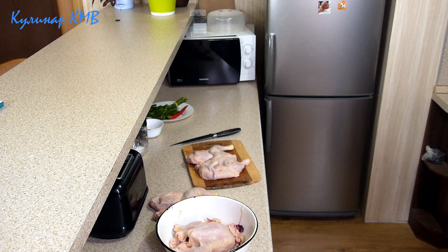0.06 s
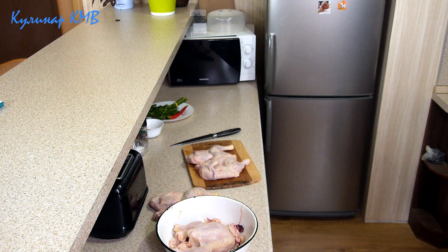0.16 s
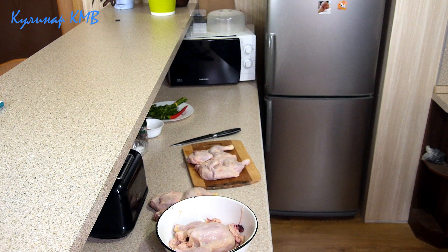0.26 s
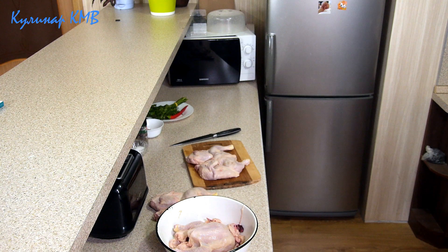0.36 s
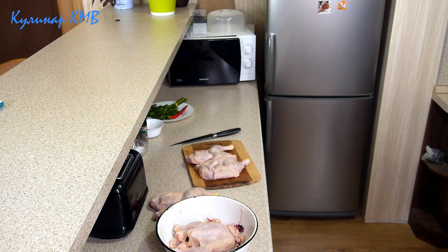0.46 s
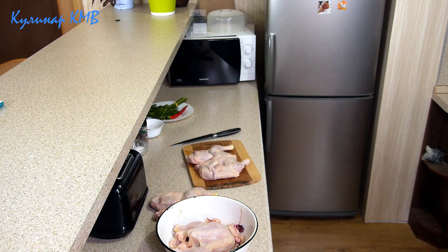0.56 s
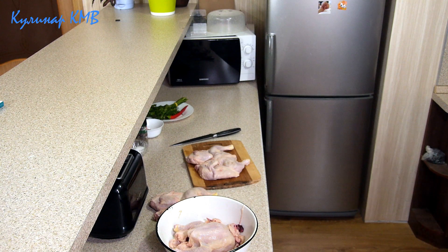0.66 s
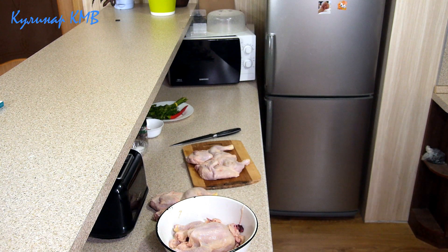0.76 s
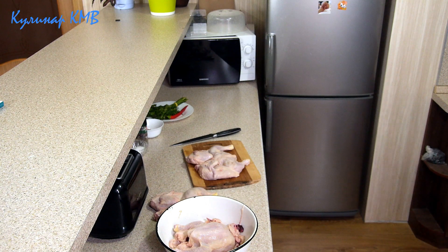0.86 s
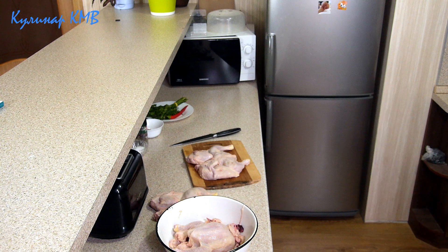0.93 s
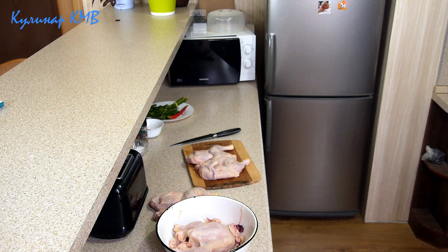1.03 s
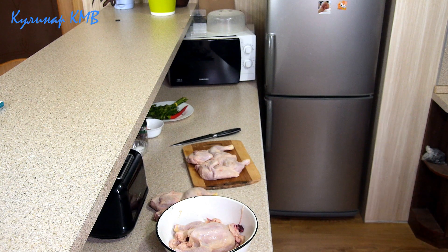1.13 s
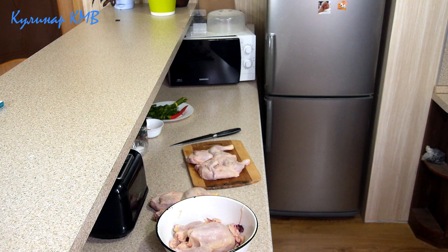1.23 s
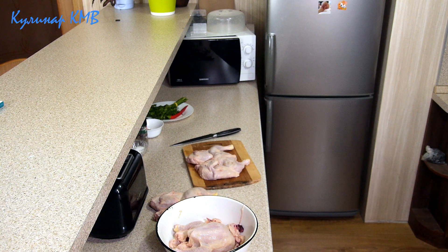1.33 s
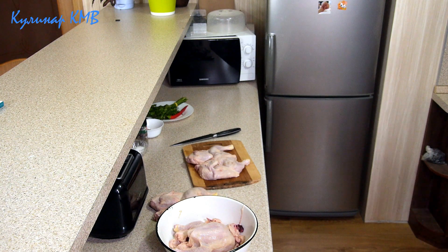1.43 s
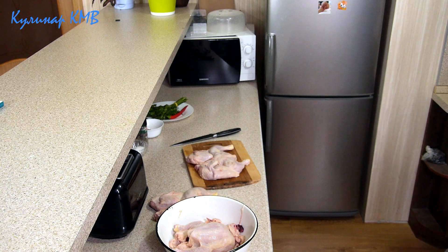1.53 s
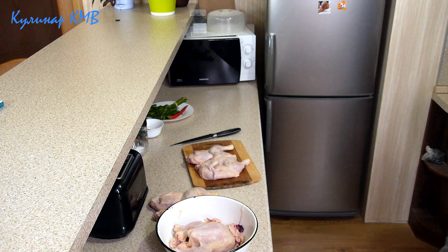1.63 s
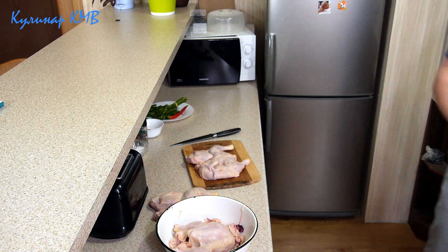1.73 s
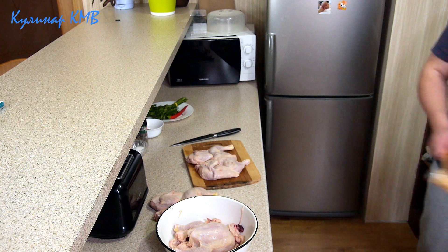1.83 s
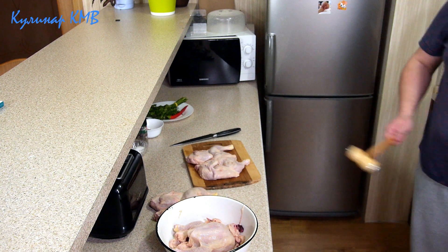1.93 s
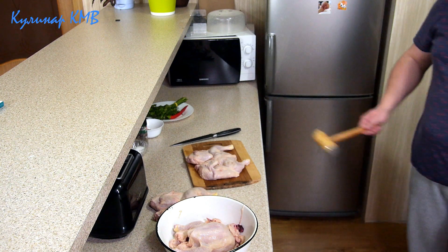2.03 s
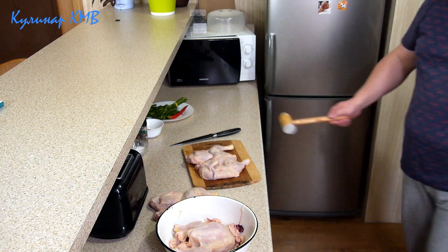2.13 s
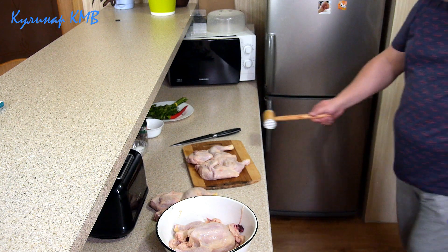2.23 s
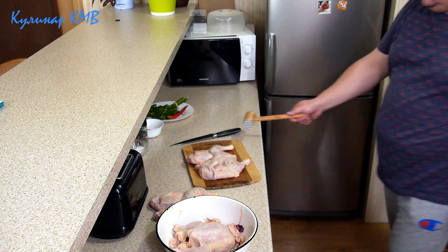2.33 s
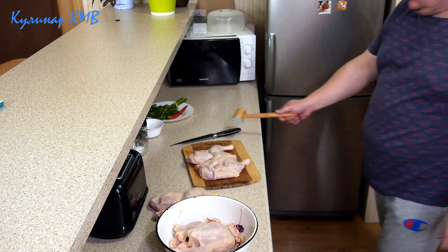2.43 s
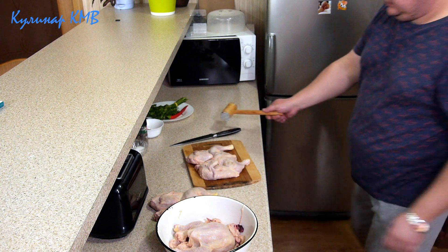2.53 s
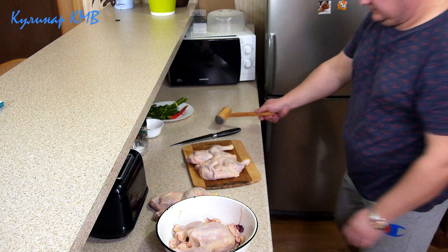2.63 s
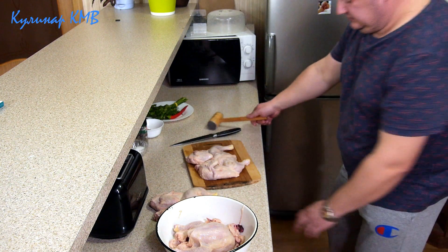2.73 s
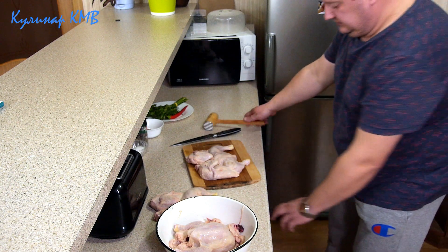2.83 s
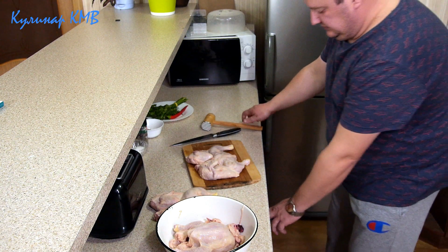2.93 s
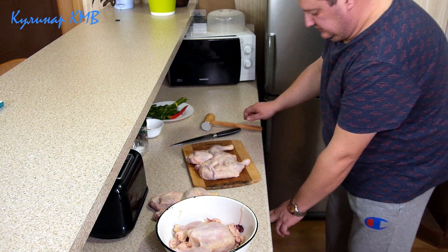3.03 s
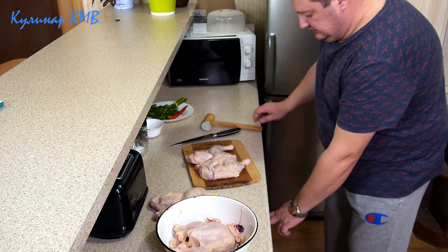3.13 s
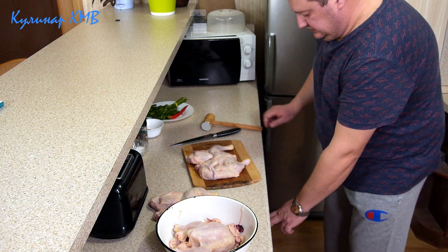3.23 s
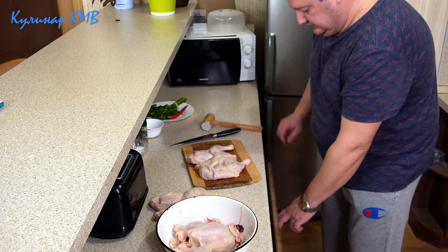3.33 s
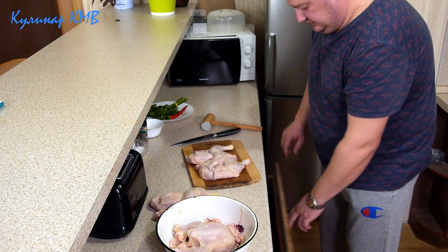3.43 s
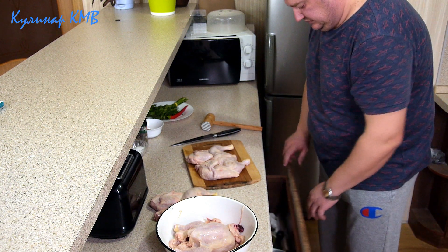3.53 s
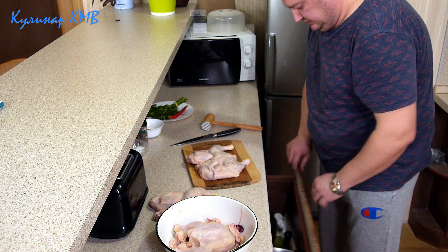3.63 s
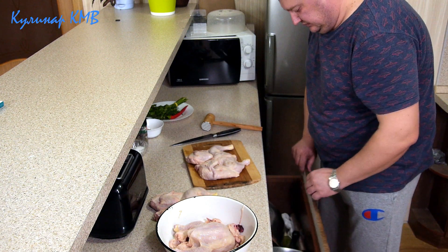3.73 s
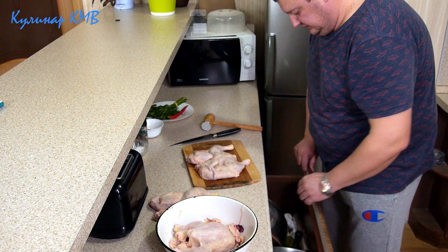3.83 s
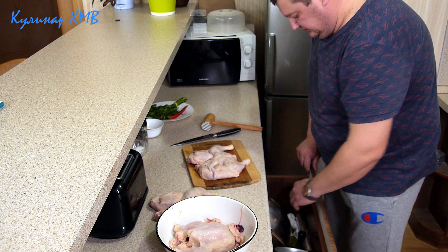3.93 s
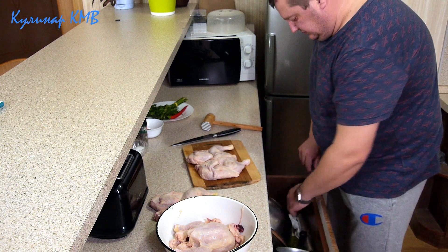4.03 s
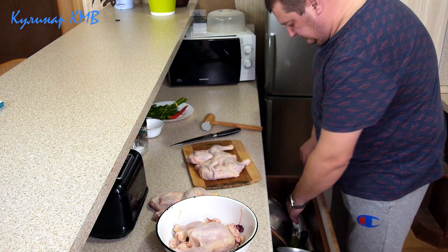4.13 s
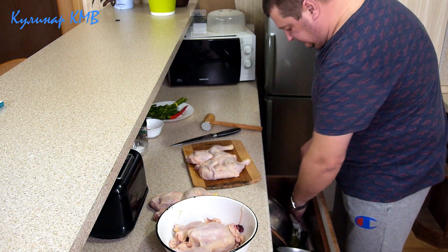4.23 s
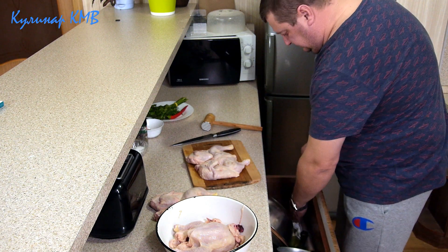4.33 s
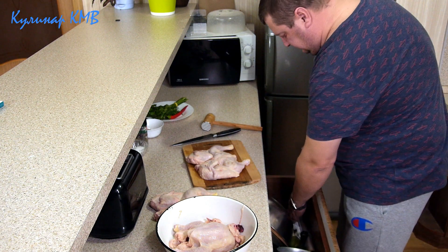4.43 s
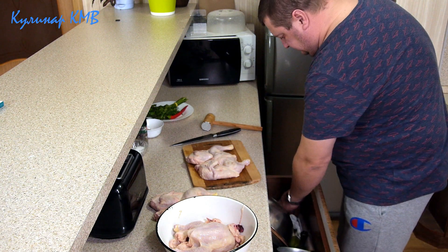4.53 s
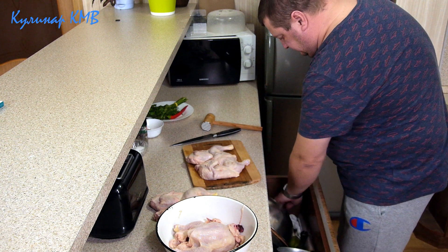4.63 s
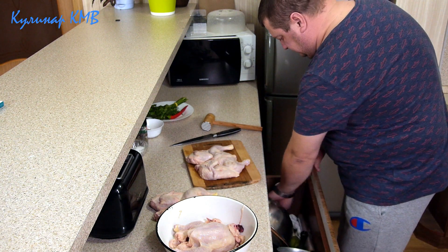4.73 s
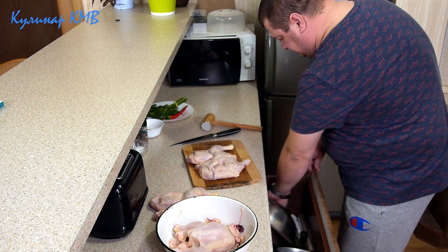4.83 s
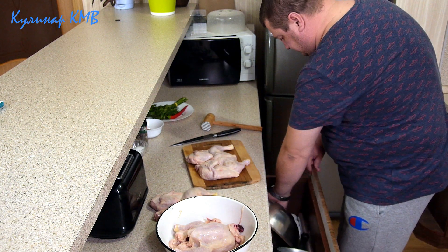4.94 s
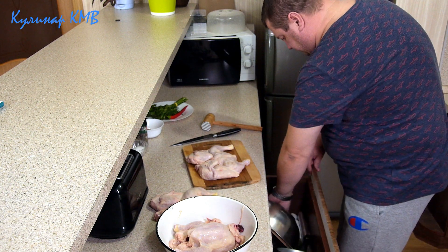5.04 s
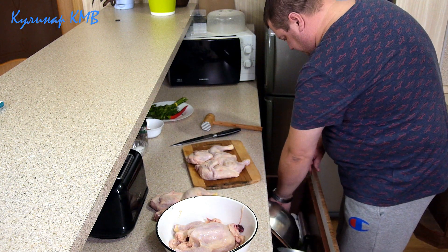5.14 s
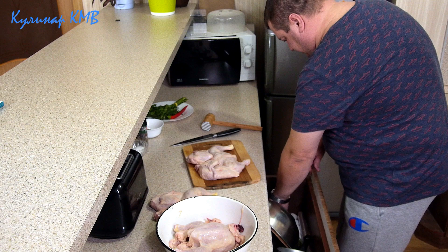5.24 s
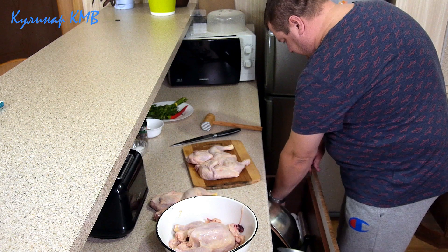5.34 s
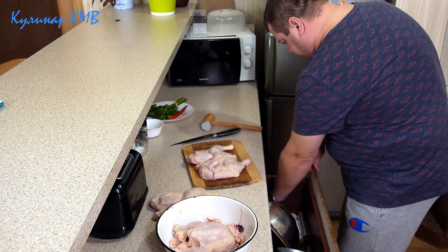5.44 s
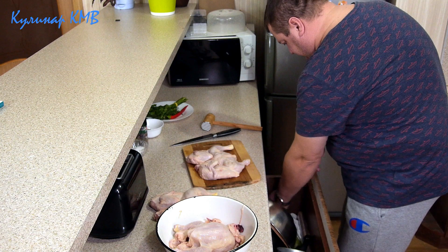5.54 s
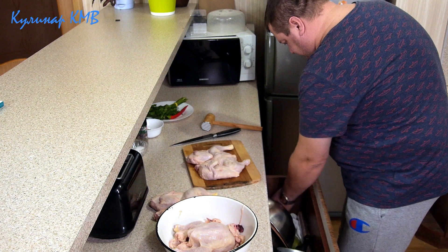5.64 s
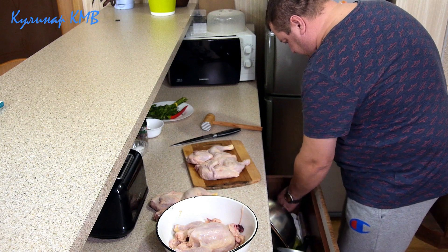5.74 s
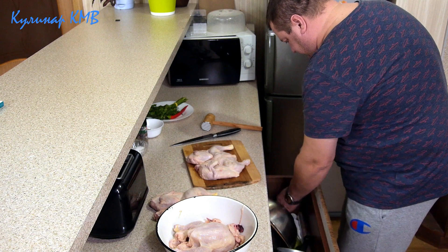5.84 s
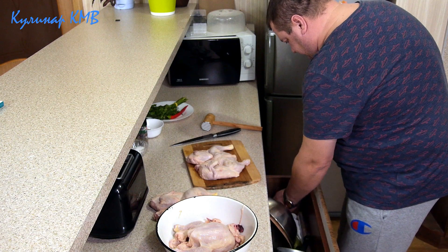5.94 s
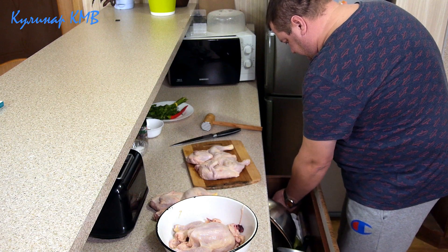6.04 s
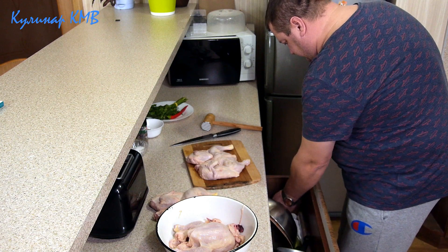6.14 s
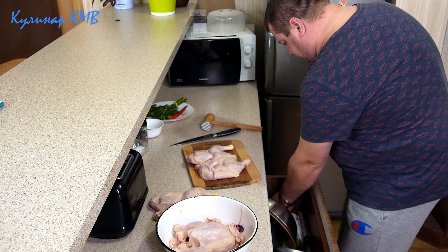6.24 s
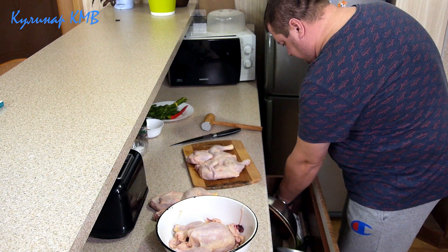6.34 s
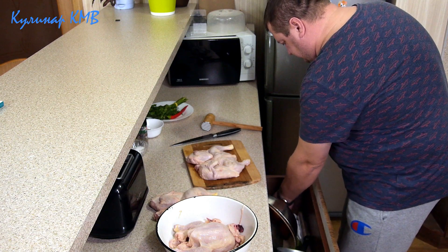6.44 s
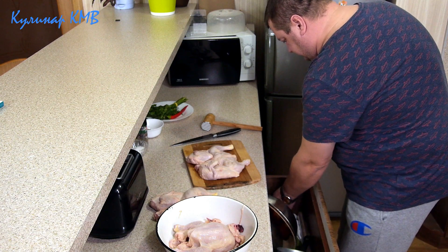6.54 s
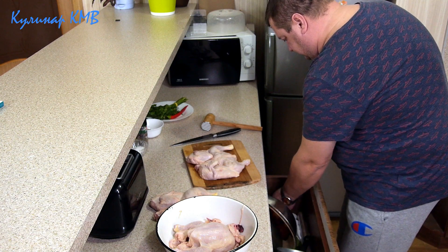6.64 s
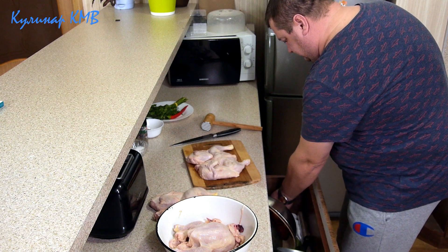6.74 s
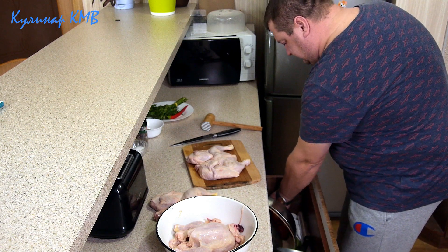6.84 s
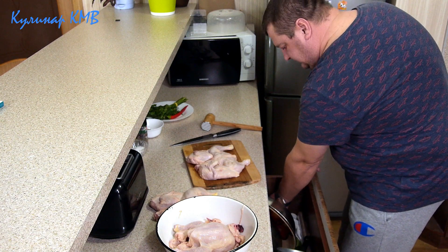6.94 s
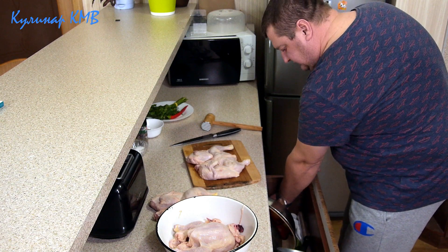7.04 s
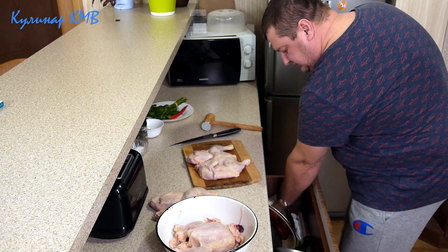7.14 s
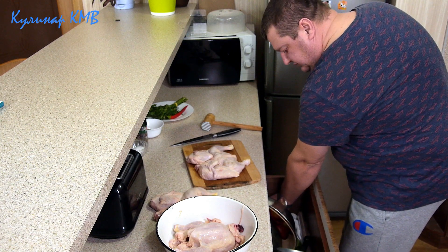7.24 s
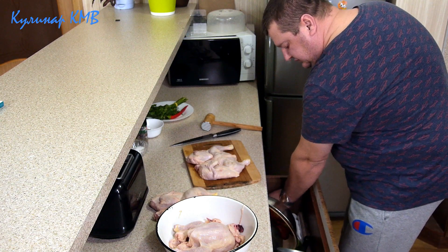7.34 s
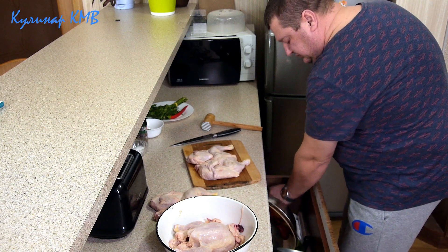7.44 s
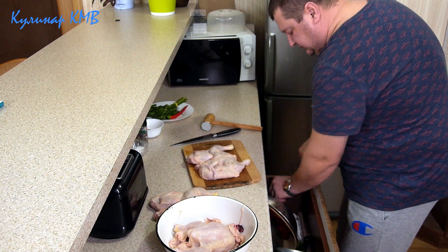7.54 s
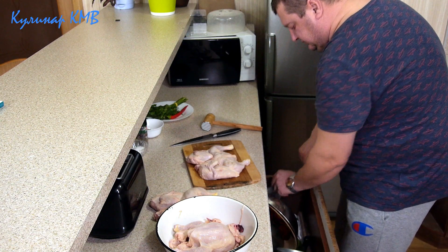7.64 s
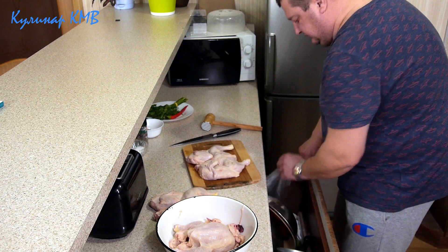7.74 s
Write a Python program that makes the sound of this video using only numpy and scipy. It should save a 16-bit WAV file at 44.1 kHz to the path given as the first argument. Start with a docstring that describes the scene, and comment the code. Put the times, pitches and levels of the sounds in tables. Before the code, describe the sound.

Off-screen cupboard clatter opens the scene: gritty metal scraping, bright clangs and a shelf knock. A near-silent gap follows, then a tight burst of hard mallet knocks on the counter. A wooden drawer rolls out, a pan bangs loudly, and a hand searches through cookware with muffled clunks, ticks and hiss. The room is live with a short tail, low hum and faint microphone hiss.

```python
"""Kitchenware, a meat mallet and a drawer

Kitchenware is dragged and clinked out of a cupboard: friction slips and blows that excite damped modes.
A meat mallet bounces on its wood and topples onto its metal head: sharp pulses leave modes ringing.
A drawer rolls open and a hand rummages among pans and pots: panel rumble, blows and a dry hiss of slips.
A fridge hums as wavering sines in a small, hard-walled kitchen of sparse, decaying echoes."""
import sys
import numpy as np
from scipy import signal
from scipy.fft import rfft, irfft
from scipy.io import wavfile
from scipy.ndimage import uniform_filter1d

SR = 44100
rng = np.random.default_rng(int(sys.argv[2]) if len(sys.argv) > 2 else 0)


def transcribe(u):
    """Save the signal u as a 16-bit wav file named by the first command-line argument.

    u: samples, shape (n,) or (channels, n), limited to [-1, 1]; the rate is SR.
    q: integer samples, one column per channel.
    """
    v = np.clip(np.atleast_2d(u).T, -1, 1)
    q = np.round(v * 32767).astype(np.int16)
    wavfile.write(sys.argv[1], SR, q)


N = 343098
HZ = np.fft.rfftfreq(4096, 1 / SR)  # frequency grid of the filters
T = np.arange(SR // 2) / SR  # time axis of one blow, s

# All levels in these tables are relative; the functions add the trim of each layer.
# Still room air and microphone hiss, spectra: [frequency_hz, level_db]
AIR_SPECTRUM = [(12, -43.5), (20, -10.5), (53, -5), (96, -2.5), (274, -5), (448, -1.5), (612, -6.5),
                (675, -9), (757, -7.5), (1000, -17.5), (1300, -50), (2200, -120)]
HISS_SPECTRUM = [(500, -10.5), (1000, 4), (2500, -4), (6000, -4), (15000, -12)]
AIR_LEVEL_DB, HISS_LEVEL_DB = -64, -68.5
# Steady lines of the fridge's hum: [pitch_hz, level_db]
FRIDGE_LINES = [(48.4, -70), (393, -84), (441.4, -73)]
# Two swells of one low line of the hum: [middle_s, length_s, level_db]
DRONE_SWELLS = [(4.2, 1.9, -70), (7.05, 1.3, -66)]
DRONE_HZ = 167

# Strokes of metal dragged over metal: [start_s, length_s, grind_db, hiss_db]
DRAG_STROKES = [(0.0, 0.17, -35.5, -38.5), (0.21, 0.42, -39.5, -43.5), (0.351, 0.041, -31.5, -31.5),
                (0.46, 0.11, -37.5, -31)]
# Low, grinding part of the drag, spectrum: [frequency_hz, level_db]
GRIND_SPECTRUM = [(59, -59), (100, -14), (140, -23), (229, -2.5), (286, -10.5), (336, -3), (476, -6.5),
                  (1160, -10), (1360, -6), (4500, -20.5), (5850, -73), (9900, -120)]
# The dragged lid sings on one mode, the turned big pot on its low mode: [start_s, length_s, level_db]
LID_SONG = [(0.451, 0.064, -37), (.555, 0.048, -37)]
POT_SONG = [(5.63, 0.06, -53)]
LID_SONG_HZ, POT_SONG_HZ = 1225, 520
BITE_S, LET_GO_S = 0.0041, 0.033  # a stroke's linear onset and its exponential release

# Crowded thin-metal modes, and the tick of rim on rim, spectra: [frequency_hz, level_db]
CLANG_SPECTRUM = [(60, -74), (200, -1), (450, -1.5), (700, -2), (1100, 1.5), (2100, 1), (2700, -1.5),
                  (4000, -4.5), (6000, -15), (15000, -82.5)]
TICK_SPECTRUM = [(800, -26), (2500, 3), (3900, -6.5), (5100, 2), (6500, 0.5), (8200, -2), (10000, -7.5),
                 (13000, -14), (16000, -35.5)]
# Blows on each object, with the thump of the wood beneath: [start_s, clang_db, thump_db, tick_db]
LID_HITS = [(0.030, -27.5, -30, -41), (0.07, -55, -53, -30.5), (0.127, -27, -30, -32),
            (0.447, -20.5, -22, -27.5), (0.501, -21, -49, -27.5), (0.553, -23.5, -43, -51)]
UTENSIL_HITS = [(0.2692, -33.5, -51, -40), (0.2904, -56, -43, -53)]
SHELF_HITS = [(0.78, -29.5, -33.5, -40.5), (0.802, -33, -40, -59), (1.037, -37, -32.5, -51.5)]  # things set down on the cupboard shelf
DOOR_HITS = [(1.222, -50.5, -40.5, -53)]  # the cupboard door pushed shut
PAN_HITS = [(4.814, -45, -49, -61), (4.916, -15, -45, -52), (4.921, -20.5, -33, -24.5),
            (4.941, -20.5, -48, -55), (5.014, -23, -57, -29.5), (5.056, -27.5, -32, -38.5),
            (5.095, -32, -28.5, -50)]
HELD_PAN_HITS = [(7.2036, -42, -61, -40), (7.2516, -70, -86, -54)]  # a pan in the hand
BIG_POT_HITS = [(5.386, -51, -32, -42), (5.401, -34, -35, -39)]
POT_HITS = [(6.069, -57, -45, -47), (6.222, -48.5, -76, -66), (6.272, -26.5, -49, -32),
            (6.437, -45, -40, -49), (6.611, -44.5, -52, -57), (7.312, -57, -51, -70),
            (7.522, -34.5, -44, -42), (7.595, -35, -42, -46), (7.768, -40.5, -48, -45)]
DRAWER_HITS = [(3.43, -39.5, -54, -45), (3.614, -46.5, -49, -51), (4.925, -26.5, -36, -50),
               (5.098, -51, -38.5, -50), (5.14, -31, -48, -51), (6.118, -50, -47.5, -45.5),
               (6.717, -43, -44, -35), (7.566, -29.5, -46.5, -27.5)]  # from its catch, its runners and pot rims
# Ringing modes of each object: [pitch_hz, level_db, t60_s]
LID_MODES = [(358, 1, 0.061), (705, -1, 0.29), (1084, 11, 0.063), (1623, -4, 0.16), (2325, -18, 0.38),
             (3550, -18, 0.13), (4760, -1, 0.088), (6130, -19, 0.1), (6170, -31, 0.16)]
UTENSIL_MODES = [(3150, -7.5, 0.052), (4060, -9, 0.063), (4040, 0, 0.022), (4520, 2, 0.014),
                 (6570, -5, 0.029)]
SHELF_MODES = [(241, 0, 0.23), (261, 7, 0.2), (344, 9, 0.17)]
DOOR_MODES = [(244, 2, 0.13), (750, 5, 0.034), (930, 2.5, 0.042), (1080, -6, .035), (1330, 0, 0.033),
              (1780, -8, .04)]
STEEL_MODES = [(5750, -7, .2), (7250, -4, .22), (7640, 6, 0.21), (7640, -10, .2)]  # a small loose piece in the cupboard
WORKTOP_MODES = [(710, 11, 0.95), (805, -6.5, .3), (905, 2, 0.34), (970, -3.5, .25), (1072, 11.5, 0.33),
                 (1130, -0.5, 0.42), (1314, -2, 0.7), (1600, -13.5, .2), (2140, -26, 0.22)]
MALLET_MODES = [(696, 6.5, 0.3), (1287, -4, 0.96), (1500, 0.5, 0.33), (1740, -10.5, 0.093),
                (1910, 2.5, 0.15), (2924, 5.5, 0.21), (3350, -10.5, .12), (5160, -4, .25)]
PAN_MODES = [(287, -20, 0.21), (326, 6, 0.095), (540, -23, 0.18), (920, -2, 0.38), (1130, 7.5, 0.16),
             (1490, 6, 0.36), (1460, 3, 0.18), (1970, 6.5, 0.15), (2140, 15, 0.04), (2220, 9.5, 0.071),
             (3030, -4, 0.16), (5540, -18, 0.22), (6600, 8.5, 0.076)]
HELD_PAN_MODES = [(932, 1, 0.12), (1510, 14, 0.086), (1540, -7, 0.082)]
BIG_POT_MODES = [(272, 6, 0.25), (329, -2, 0.27), (510, 3.5, 0.28), (741, 3, 0.16), (1047, -3, 0.5),
                 (1164, -0.5, 0.41), (1530, -13.5, 0.88), (2160, -7.5, 0.37)]
POT_MODES = [(182, 4, 0.057), (377.4, 11, 0.3), (804, 2.5, 0.37), (847, 10, 0.29), (974, -3, 0.45),
             (1108, 13, 0.16), (1203, -21, 0.71), (1560, 4, 0.2), (2156, -22, 0.19), (5000, 7, .15)]
DRAWER_MODES = [(180, 23, 0.15), (300, -11, 0.047), (378, 13, 0.14), (634, -13, .15), (960, 28, .1)]
# Light touches of steel on steel: [start_s, level_db]
CUPBOARD_TOUCHES = [(0.78, -39.5), (1.037, -53)]
DRAWER_TOUCHES = [(5.731, -51), (5.803, -50), (5.965, -49), (6.12, -57), (6.37, -55)]

# Things shifted over wood, on the shelf, runners and drawer bottom: [middle_s, length_s, level_db]
WOOD_SLIDES = [(0.95, 0.54, -51), (3.62, 0.24, -50), (3.85, 0.41, -68), (5.6, 0.41, -53.5),
               (6.07, .15, -48.5), (6.3, .12, -43.5), (6.56, 0.05, -47.5), (7.04, 0.083, -56),
               (7.3, 0.96, -64), (7.73, 0.15, -53.5)]
# Sliding on wood, spectrum: [frequency_hz, level_db]
SLIDE_SPECTRUM = [(50, -28), (110, 0.5), (170, -2), (300, 3.5), (500, 0.5), (900, 0.5), (2000, -8.5),
                  (4000, -10), (9000, -40)]
# Cloth and wrappings brushing past things: [middle_s, length_s, level_db]
CLOTH_BRUSHES = [(2.48, 0.39, -64), (3.58, 0.46, -63), (4.68, 0.15, -58), (4.9, 0.11, -43),
                 (6.26, 0.021, -54)]
# Unbroken rustle of the searching hand, points on its level curve: [time_s, level_db]
HAND_RUSTLE = [(5.25, -57.5), (5.42, -52), (5.6, -51.5), (5.76, -57), (6.06, -58.5), (6.46, -54),
               (6.67, -59.5), (6.78, -56.5), (7.5, -50.5), (7.67, -47.5), (7.77, -45.5)]
# Rustle, spectrum: [frequency_hz, level_db]
RUSTLE_SPECTRUM = [(700, -12), (1500, -3.5), (3500, -4.5), (5500, -1.5), (7700, 1.5), (10000, -2),
                   (13500, -6.5), (16000, -20)]
# Mallet landings on its wood, then on its head: [start_s, level_db, brightness_db_per_octave, chatter_s]
WOOD_LANDINGS = [(2.7648, -22, -4.5, 0.0065), (2.7794, -18, 4, 0.000077), (2.8609, -20.5, 2.5, .0001),
                 (2.9100, -25.5, 4.5, 0.000088)]
HEAD_LANDINGS = [(2.9375, -17.5, -5.5, 0.0049), (3.0205, -23.5, -7, 0.0059)]
# Contact spectra of those landings: [frequency_hz, level_db]
WOOD_CONTACT = [(70, -47), (130, -5), (205, -4.5), (310, -11), (560, -5.5), (690, 4.5), (1200, 7),
                (1600, 2), (2100, -2), (2700, -27), (3400, -15.5), (4500, -41.5), (9000, -41.5),
                (15000, -66.5)]
HEAD_CONTACT = [(70, -26), (150, -14), (420, -14), (720, -4), (2000, 1), (2500, -7.5), (3600, 1),
                (4500, -15), (5250, 2.5), (5800, -18.5), (8500, -17.5), (15000, -69)]
# Echoes off the backsplash and the appliances round the worktop: [delay_s, level_db]
CLOSE_ECHOES = [(.0025, -16.5), (.0054, -23.5), (.008, -26.5)]
# The drawer pulled open: [middle_s, length_s, level_db]
DRAWER_ROLL = [(3.62, 0.23, -49.5)]

# Decay time of the kitchen: [frequency_hz, t60_s]
KITCHEN_T60 = [(120, 0.53), (400, 0.68), (1200, 0.62), (3000, 0.56), (6000, 0.53), (10000, 0.35),
               (16000, 0.35)]
# Stereo width as side minus mid, and the tilt as left minus right: [frequency_hz, level_db]
STEREO_WIDTH = [(60, -3.5), (150, -12.5), (500, -11), (1000, -6.5), (2000, -3), (4500, -3), (9000, -3.5),
                (15000, 1)]
STEREO_TILT = [(100, -3), (400, -0.1), (1200, 0), (2500, -2), (5000, -1), (8000, 0), (14000, 2)]
TREBLE_LIMIT_HZ = 15750


def amp(db):
    """Logarithmic level: decibels to gain."""
    return 10 ** (np.asarray(db) / 20)


def read(points, hz=HZ):
    """Interpolation of a spectrum on a logarithmic frequency axis."""
    f, value = np.transpose(points)
    return np.interp(np.log(hz + 1), np.log(f + 1), value)


def steady(x):
    """Mean power: scales a lasting sound to rms 1."""
    return x / np.sqrt(np.mean(x ** 2) + 1e-20)


def brief(x):
    """Total energy: scales a blow to the energy of 20 ms at rms 1."""
    return x * np.sqrt(SR / 50 / (np.sum(x ** 2) + 1e-20))


def add(mix, s, sound):
    """Superposition: mixes a sound in, in place, at time s."""
    part = mix[max(round(s * SR), 0):][:len(sound)]
    part += sound[:len(part)]


def level(s, db):
    """Level curve as gain, straight in decibels, fading out within 30 ms beyond its ends."""
    times = np.r_[s[0] - .03, s, s[-1] + .03]
    return amp(np.interp(np.arange(N) / SR, times, np.r_[-110, db, -110]))


def strokes(rows):
    """Scraping envelope: each stroke bites, holds and lets go; the strongest prevails."""
    t = np.arange(N) / SR
    gains = []
    for s, length, db in rows:
        bite = np.clip((t - s) / BITE_S, 0, 1)
        let_go = np.exp(-np.maximum(t - s - length, 0) / LET_GO_S)
        gains.append(amp(db) * bite * let_go)
    return np.max(gains, axis=0)


def swells(rows):
    """Gaussian envelope of smooth movements that gather speed and slow down again."""
    t = np.arange(N) / SR
    return sum(amp(db) * np.exp(-(2 * (t - s) / length) ** 2) for s, length, db in rows)


def colour(x, db):
    """Minimum phase: a causal filter with gain db on the HZ grid, by folding the cepstrum."""
    cepstrum = irfft(np.log(amp(db) + 1e-6))
    half = len(cepstrum) // 2
    cepstrum[1:half] *= 2
    cepstrum[half + 1:] = 0
    impulse_response = irfft(np.exp(rfft(cepstrum)))
    return signal.oaconvolve(x, impulse_response)[:len(x)]


def wavering(hz, width_hz, size):
    """Phase diffusion: a sine whose phase wanders, as in metal that keeps touching its neighbours."""
    wander = np.cumsum(rng.standard_normal(size)) * np.sqrt(2 * np.pi * abs(width_hz) / SR)
    wander = uniform_filter1d(wander, size=200)
    return np.sin(2 * np.pi * hz * np.arange(size) / SR + wander)


def ringing(modes):
    """Modal superposition: an object's free ring is a sum of dying tones, each about 20 Hz wide."""
    ring = np.zeros(len(T))
    for hz, db, t60 in modes:
        decay = amp(db - 60 * T / max(t60, .01))
        ring += decay * wavering(hz, 22, len(T)) * rng.choice([-1, 1])
    return ring


def contact(chatter_s, first=2.9):
    """Impact excitation: a first touch of height first, then an exponentially dying chatter."""
    x = rng.standard_normal(len(T)) * np.exp(-T / max(chatter_s, 1e-4))
    x[0] = first
    return x


def slips(per_s, spread_db):
    """Stick-slip friction: a random train of slips of uneven size, scaled to rms 1."""
    size = amp(spread_db * np.minimum(rng.exponential(1, N), 4))
    happens = rng.random(N) < per_s / SR
    return steady(size * rng.standard_normal(N) * happens)


def judder():
    """Unsteady friction: the gain of a sliding rim that catches and frees itself about every 15 ms."""
    sway = uniform_filter1d(uniform_filter1d(rng.standard_normal(N), size=600), size=100)
    return amp(2.5 * steady(sway))


def stereo(mid, side, left_db):
    """Interchannel coherence: mid and side give two channels, alike in the bass, less so in the treble."""
    side, lean_db = colour(side, read(STEREO_WIDTH)), (left_db + read(STEREO_TILT)) / 2
    return np.array([colour(mid + side, lean_db), colour(mid - side, -lean_db)])


def background(air_db=-2, hum_db=-1, waver_rad=.15):
    """Stationary noise and steady tones: still air, a faint hiss and the fridge's slightly wavering hum."""
    def noise(spectrum):
        """Filtered white noise at rms 1."""
        return steady(colour(rng.standard_normal(N), read(spectrum)))

    def bed():
        """Sum of two independent noises."""
        return amp(AIR_LEVEL_DB + air_db) * noise(AIR_SPECTRUM) + amp(HISS_LEVEL_DB) * noise(HISS_SPECTRUM)

    mid, side = bed(), bed()
    t = np.arange(N) / SR
    lines = [(hz, amp(db)) for hz, db in FRIDGE_LINES] + [(DRONE_HZ, swells(DRONE_SWELLS))]
    for hz, gain in lines:
        drift = steady(uniform_filter1d(uniform_filter1d(rng.standard_normal(N), size=6000), size=6000))
        tone = np.sin(2 * np.pi * hz * t + waver_rad * drift)
        mid = mid + gain * amp(hum_db) * np.sqrt(2) * tone
    return stereo(mid, side, left_db=2.1)


def drag(grind_db=-2, hiss_db=-2, ring_db=-9):
    """Friction-driven resonance: a lid scrapes over other metal and the slips keep it ringing."""
    grind = strokes([(s, length, db) for s, length, db, _ in DRAG_STROKES])
    hiss = strokes([(s, length, db) for s, length, _, db in DRAG_STROKES])
    grip = slips(per_s=2700, spread_db=1.5) * judder()
    lid = ringing(LID_MODES)
    ring = signal.oaconvolve(grip * grind, lid / np.linalg.norm(lid))[:N]
    body = steady(colour(grip, read(GRIND_SPECTRUM))) * grind
    treble = steady(colour(grip, read(TICK_SPECTRUM))) * hiss
    return amp(grind_db) * body + amp(ring_db) * ring + amp(hiss_db) * treble


def clatter(rows, modes, clang_db, thump_db, tick_db, ring_db, chatter_s, thump_hz,
            thump_octaves=0.46, thump_s=0.013, lowest_hz=110, rise_s=0.0021):
    """Impact radiation: each blow clangs the metal, ticks at the rim and thumps the wood beneath."""
    out = np.zeros(N)
    bass_cut = -10 * np.log10(1 + (lowest_hz / (HZ + 1)) ** 10)
    # one broad panel resonance
    panel = -20 * np.log10(1 + (np.log2((HZ + 1) / thump_hz) / thump_octaves) ** 2)
    # loose things give way before they bite: zero at first, so only the chatter sounds in clang and tick
    give = 1 - np.exp(-T / rise_s)
    for s, body, low, high in rows:
        touch = contact(chatter_s) * give
        ring = brief(ringing(modes) * give)
        clang = amp(clang_db) * brief(colour(touch, read(CLANG_SPECTRUM))) + amp(ring_db) * ring
        tick = brief(colour(touch, read(TICK_SPECTRUM)))
        thump = brief(colour(contact(thump_s), panel))
        add(out, s, amp(body) * clang + amp(high + tick_db) * tick + amp(low + thump_db) * thump)
    return colour(out, bass_cut)  # small objects radiate no deep bass


def singing(rows, hz, width_hz=12):
    """Self-sustained oscillation: stick and slip keep one mode of a lid or pot going."""
    return np.sqrt(2) * wavering(hz, width_hz, N) * strokes(rows)


def shifting(db=-1):
    """Panel excitation: coarse slips rumble in wooden panels."""
    sound = steady(colour(slips(per_s=700, spread_db=2.5), read(SLIDE_SPECTRUM)))
    return amp(db) * sound * swells(WOOD_SLIDES)


def cupboard_tinks(ring_db=-2):
    """Free vibration: light touches leave the loose steel piece ringing."""
    out = np.zeros(N)
    for s, db in CUPBOARD_TOUCHES:
        add(out, s, amp(db + ring_db) * brief(ringing(STEEL_MODES)))
    return out


def rustle(db=1, rummage_db=4):
    """Dense friction: very fine slips merge into a dry hiss."""
    sound = steady(colour(slips(per_s=5000, spread_db=7.0), read(RUSTLE_SPECTRUM)))
    brushing = amp(db) * swells(CLOTH_BRUSHES)
    searching = amp(rummage_db) * level(*np.transpose(HAND_RUSTLE))
    return sound * (brushing + searching)


def mallet(rows, spectrum, modes, ring_db, buzz_db, settle_db, first, buzz_s=0.022):
    """Repeated impact: sharp pulses leave modes ringing and the head buzzing, less with every bounce."""
    out = np.zeros(N)
    for bounce, (s, db, bright, chatter) in enumerate(rows):
        tilt = bright * np.log2(1 + HZ / 1500)  # per octave well above 1500 Hz
        crack = brief(colour(contact(chatter, first), read(spectrum) + tilt))
        buzz = brief(colour(contact(buzz_s, first=2), read(TICK_SPECTRUM)))
        ring = brief(ringing(modes))
        add(out, s, amp(db) * (crack + amp(ring_db) * ring + amp(buzz_db - settle_db * bounce) * buzz))
    return out


def slapped(x):
    """Specular reflection: adds single echoes from close, hard surfaces."""
    out = x.copy()
    for delay, db in CLOSE_ECHOES:
        add(out, delay, amp(db) * x)
    return out


def rolling(box_hz=250, octaves=0.79):
    """Box resonance: the rollers rumble in the one broad resonance of the drawer's box."""
    box = -20 * np.log10(1 + (np.log2((HZ + 1) / box_hz) / octaves) ** 4)
    return steady(colour(slips(per_s=310, spread_db=3), box)) * swells(DRAWER_ROLL)


def drawer_tinks(tick_db=0, chatter_s=0.0067):
    """Damped contact: the stacked rims in the drawer only tick."""
    out = np.zeros(N)
    for s, db in DRAWER_TOUCHES:
        add(out, s, amp(db + tick_db) * brief(colour(contact(chatter_s), read(TICK_SPECTRUM))))
    return out


def reflections(early_db, early_t60):
    """Reverberation: sparse echoes, a quick cluster off nearby cabinets and the kitchen's tail."""
    at = np.arange(100, SR - 10, 10)  # one echo in every 10 samples
    taps = np.zeros(SR)
    taps[at + rng.integers(0, 10, len(at))] = rng.choice([-1., 1.], len(at))
    hz, t, z = signal.stft(taps, SR, nperseg=256)
    tail = amp(-60 * t / read(KITCHEN_T60, hz)[:, None])
    early = amp(early_db - 60 * t / early_t60)
    echoes = signal.istft(z * np.hypot(tail, early), SR, nperseg=256)[1]
    return echoes / np.linalg.norm(echoes)


def kitchen(x, direct_db, room_db, early_db, early_t60, left_db):
    """Direct and reverberant field: a source heard straight and through the room."""
    def room():
        """Convolution with a fresh set of echoes."""
        return amp(room_db) * signal.oaconvolve(x, reflections(early_db, early_t60))[:N]

    mid, side = room(), room()
    return stereo(amp(direct_db) * x + mid, side, left_db)


def scene():
    """Superposed fields: the far cupboard, near worktop, drawer and rustle, each with its own echoes."""
    cupboard = cupboard_tinks() + drag() + singing(LID_SONG, LID_SONG_HZ)
    cupboard += clatter(LID_HITS, LID_MODES, clang_db=-6.5, thump_db=-16, tick_db=-3, ring_db=-17.5,
                        chatter_s=0.017, thump_hz=342, lowest_hz=192)
    cupboard += clatter(UTENSIL_HITS, UTENSIL_MODES, clang_db=-0.5, thump_db=-21, tick_db=8, ring_db=7.5,
                        chatter_s=0.008, thump_hz=400, rise_s=0.0004)
    cupboard += clatter(SHELF_HITS, SHELF_MODES, clang_db=-5, thump_db=-6.0, tick_db=7.0, ring_db=-11.5,
                        chatter_s=0.015, thump_hz=269, lowest_hz=186)
    cupboard += clatter(DOOR_HITS, DOOR_MODES, clang_db=2.5, thump_db=-4.5, tick_db=0.5, ring_db=9,
                        chatter_s=0.0039, thump_hz=236, rise_s=0.00058)

    on_wood = mallet(WOOD_LANDINGS, WOOD_CONTACT, WORKTOP_MODES,
                     ring_db=-10.5, buzz_db=-15.5, settle_db=8, first=18)
    on_head = mallet(HEAD_LANDINGS, HEAD_CONTACT, MALLET_MODES,
                     ring_db=-18.5, buzz_db=-25, settle_db=1, first=1.9)
    worktop = slapped(on_wood + on_head)

    # shifting() also holds the slide on the cupboard shelf
    drawer = drawer_tinks() + rolling() + shifting() + singing(POT_SONG, POT_SONG_HZ)
    drawer += clatter(PAN_HITS, PAN_MODES, clang_db=-3.5, thump_db=0.5, tick_db=5.5, ring_db=-4.5,
                      chatter_s=0.0069, thump_hz=340, thump_octaves=0.81, lowest_hz=81)
    drawer += clatter(HELD_PAN_HITS, HELD_PAN_MODES, clang_db=-15, thump_db=-10, tick_db=-11, ring_db=-3,
                      chatter_s=0.0049, thump_hz=450)
    drawer += clatter(BIG_POT_HITS, BIG_POT_MODES, clang_db=-0.5, thump_db=-3.5, tick_db=1, ring_db=2.5,
                      chatter_s=0.01, thump_hz=303)
    drawer += clatter(POT_HITS, POT_MODES, clang_db=-5.0, thump_db=1.0, tick_db=-3.0, ring_db=-8.5,
                      chatter_s=0.0062, thump_hz=358)
    drawer += clatter(DRAWER_HITS, DRAWER_MODES, clang_db=-5.5, thump_db=-0.5, tick_db=-6, ring_db=-14,
                      chatter_s=0.0056, thump_hz=185)

    return (kitchen(cupboard, direct_db=-5.5, room_db=-5.0, early_db=3.5, early_t60=0.16, left_db=1.0)
            + kitchen(worktop, direct_db=-2.5, room_db=-2.0, early_db=3.5, early_t60=0.093, left_db=2.0)
            + kitchen(drawer, direct_db=-5.0, room_db=-4.0, early_db=2.5, early_t60=0.36, left_db=2.1)
            + kitchen(rustle(), direct_db=-9.5, room_db=-4, early_db=-17, early_t60=.1, left_db=2.5)
            + background())


def record(dry):
    """Saturation and band limiting: high peaks are softly rounded, then the top treble is cut."""
    rounded = dry / (1 + (dry / .85) ** 6) ** (1 / 6)
    low_pass = signal.firwin(511, TREBLE_LIMIT_HZ, window=("kaiser", 9), fs=SR)
    return signal.oaconvolve(rounded, low_pass[None], "same")


dry = scene()
out = record(dry)
transcribe(out)
```